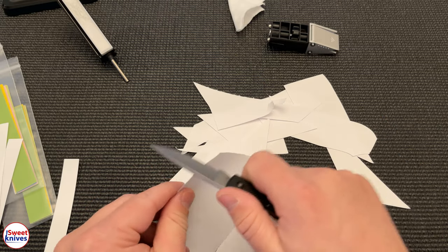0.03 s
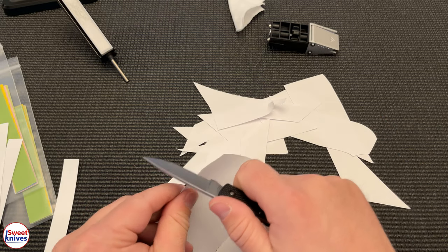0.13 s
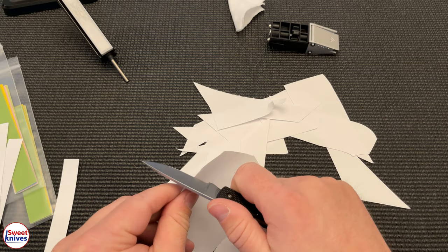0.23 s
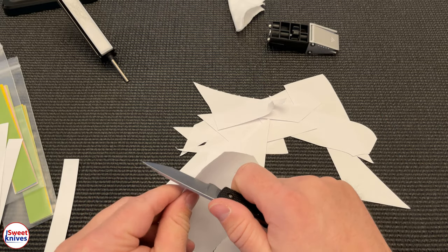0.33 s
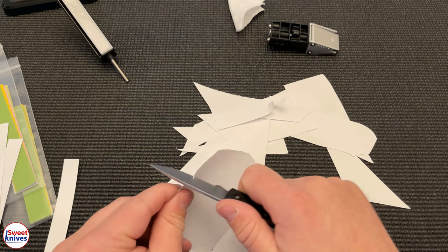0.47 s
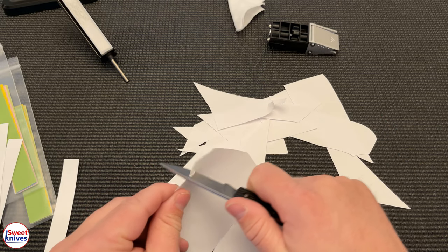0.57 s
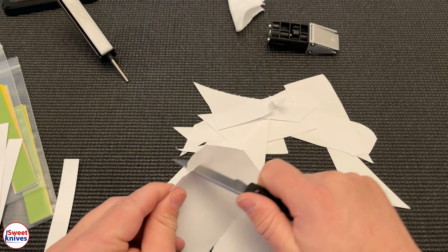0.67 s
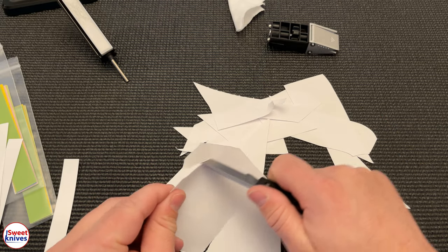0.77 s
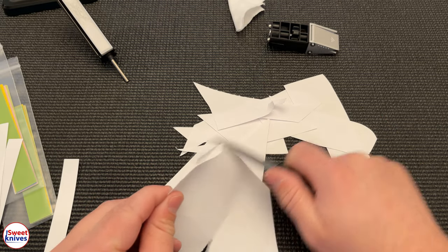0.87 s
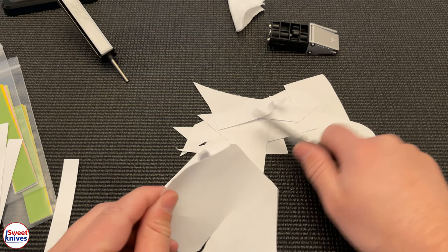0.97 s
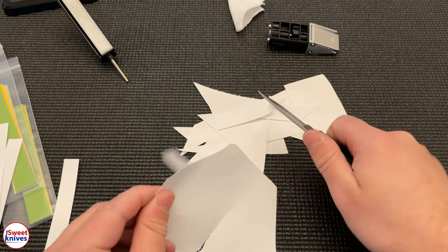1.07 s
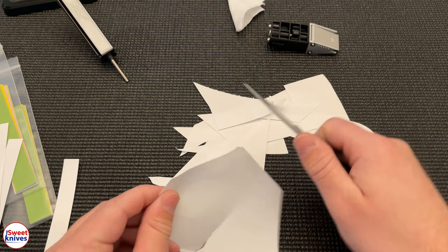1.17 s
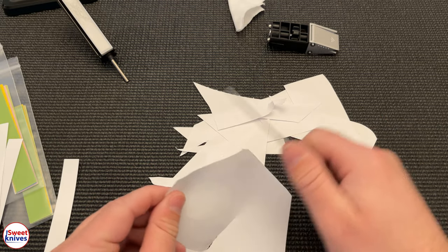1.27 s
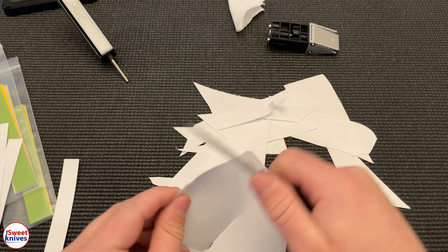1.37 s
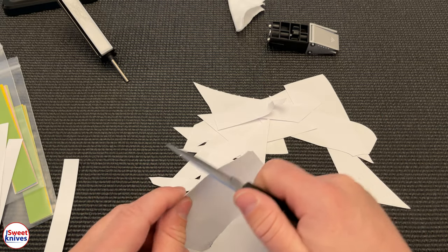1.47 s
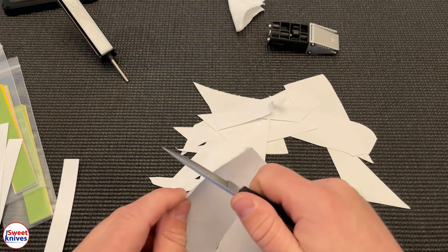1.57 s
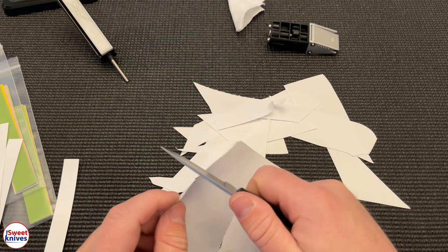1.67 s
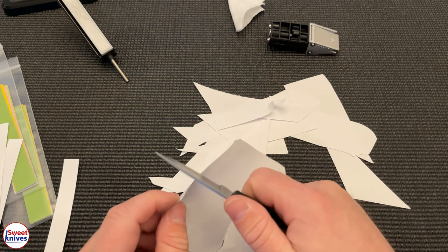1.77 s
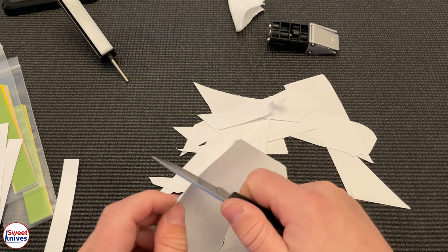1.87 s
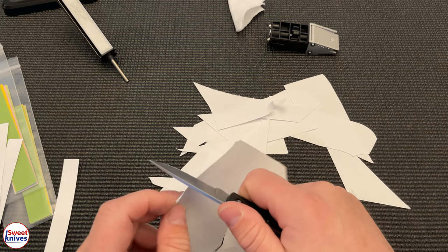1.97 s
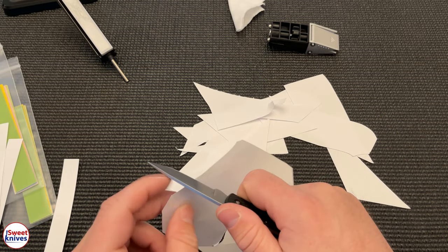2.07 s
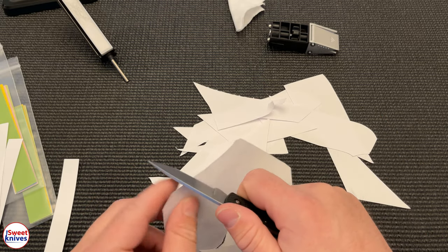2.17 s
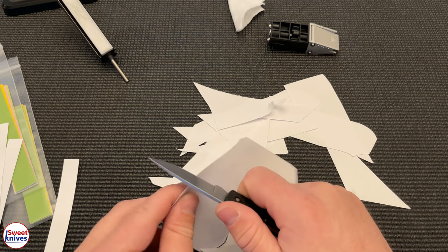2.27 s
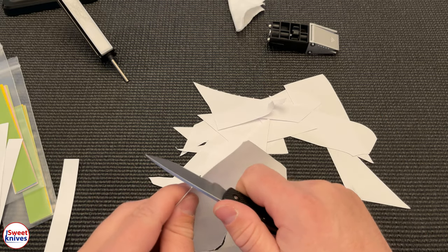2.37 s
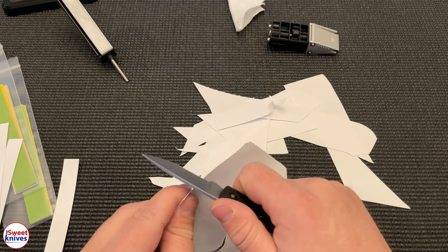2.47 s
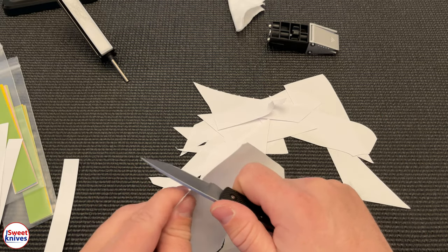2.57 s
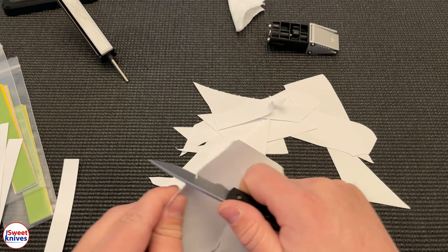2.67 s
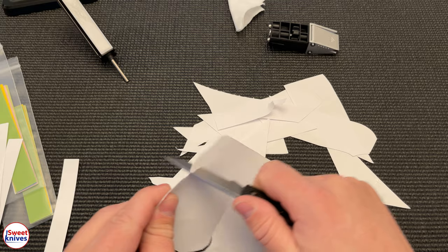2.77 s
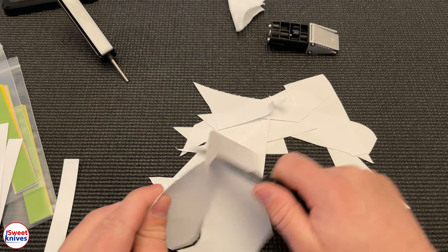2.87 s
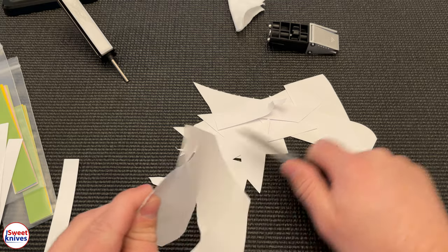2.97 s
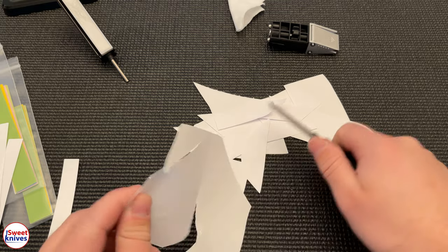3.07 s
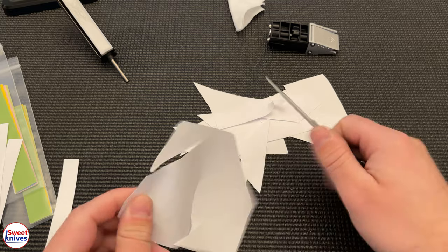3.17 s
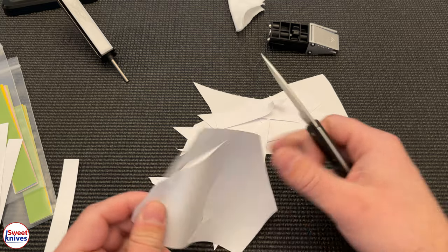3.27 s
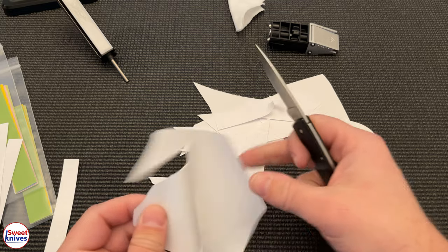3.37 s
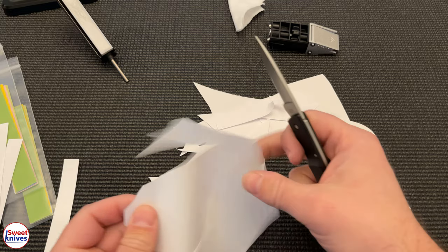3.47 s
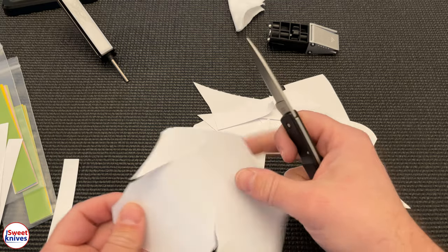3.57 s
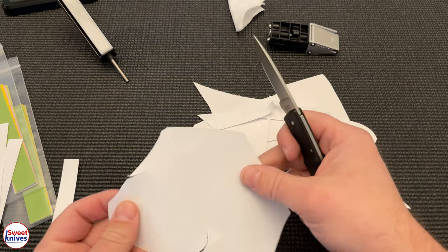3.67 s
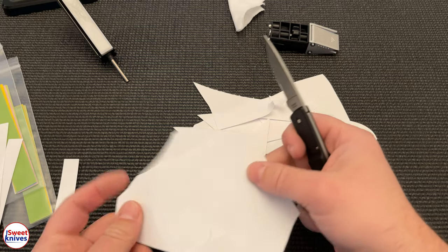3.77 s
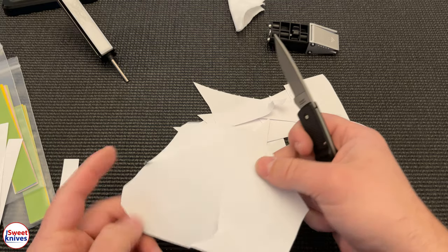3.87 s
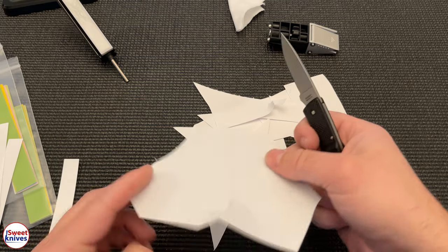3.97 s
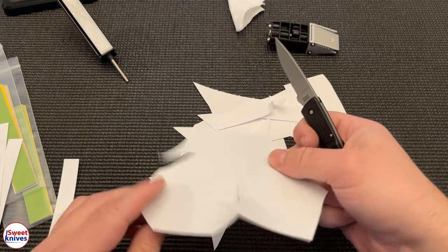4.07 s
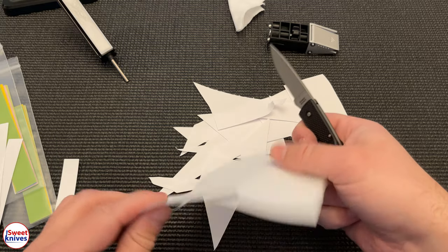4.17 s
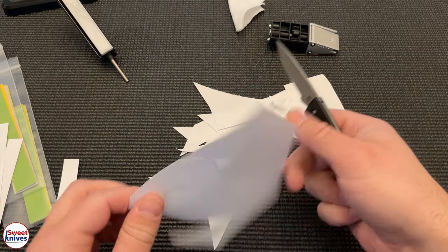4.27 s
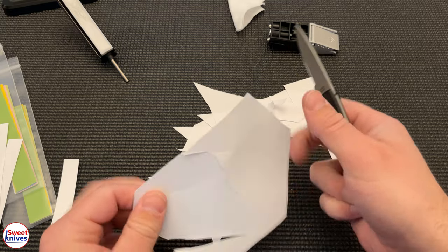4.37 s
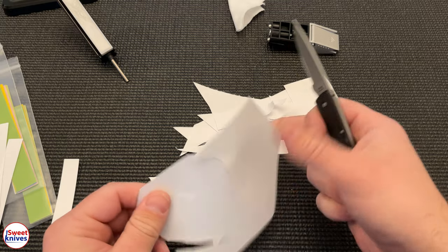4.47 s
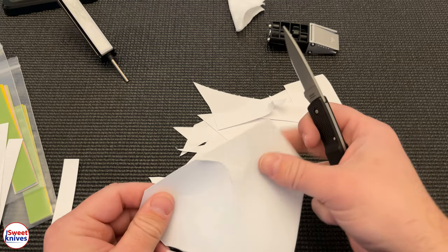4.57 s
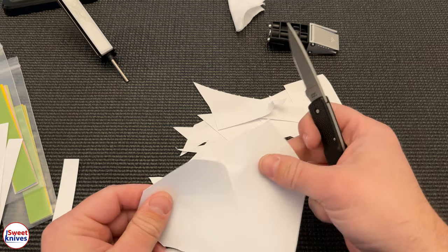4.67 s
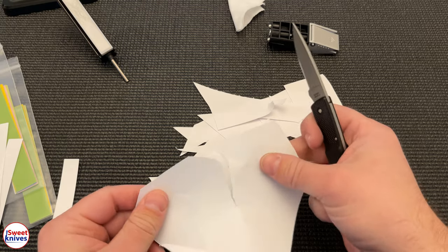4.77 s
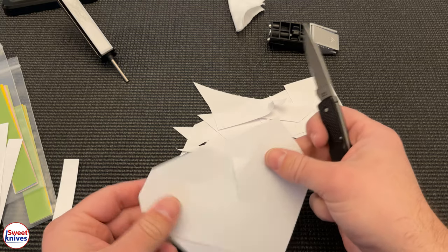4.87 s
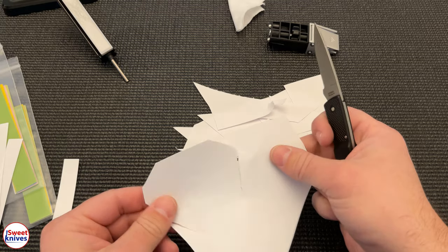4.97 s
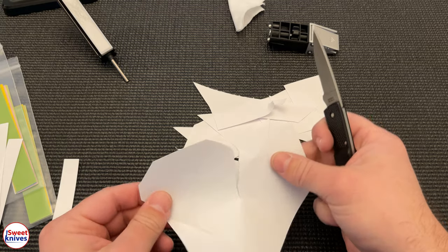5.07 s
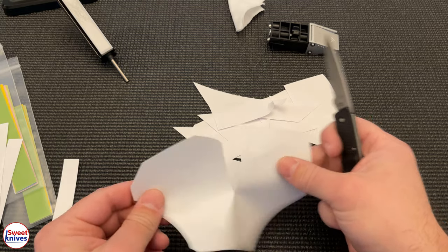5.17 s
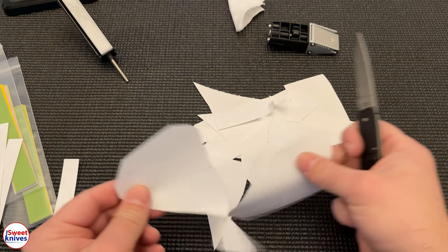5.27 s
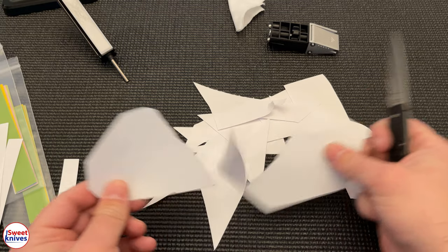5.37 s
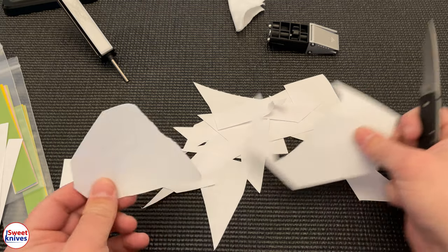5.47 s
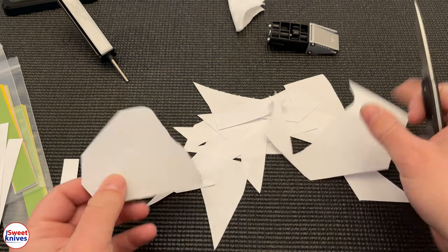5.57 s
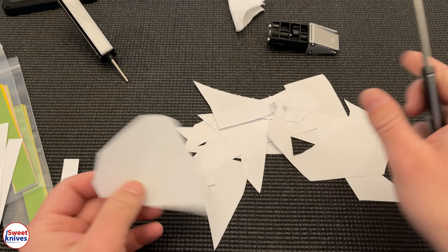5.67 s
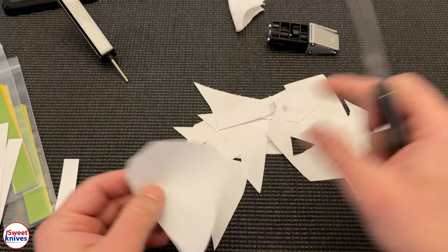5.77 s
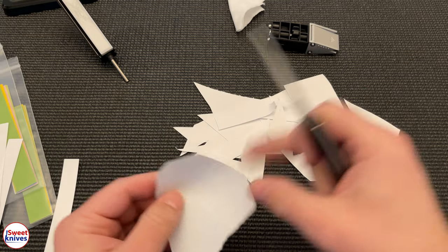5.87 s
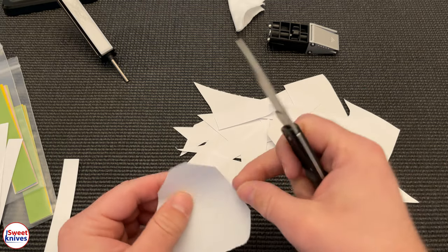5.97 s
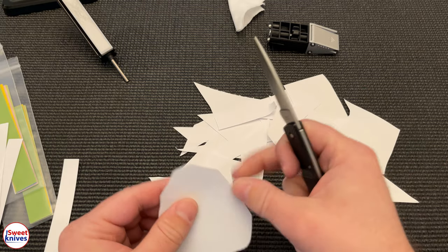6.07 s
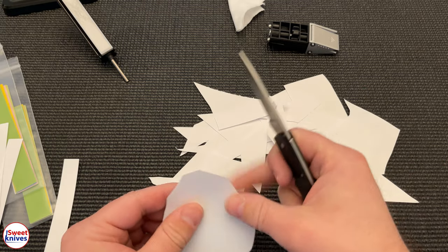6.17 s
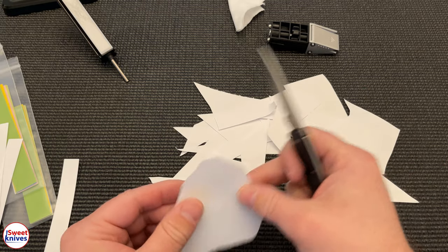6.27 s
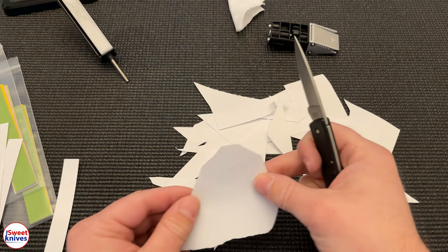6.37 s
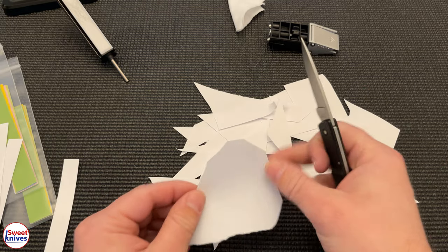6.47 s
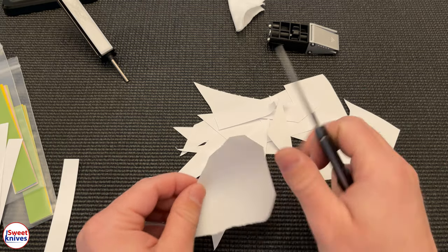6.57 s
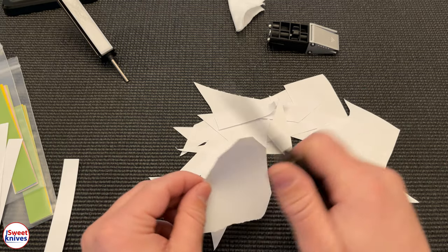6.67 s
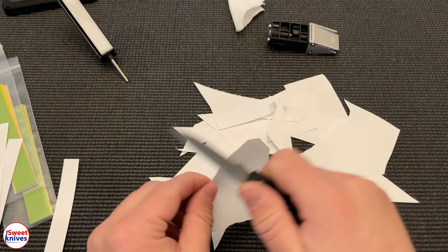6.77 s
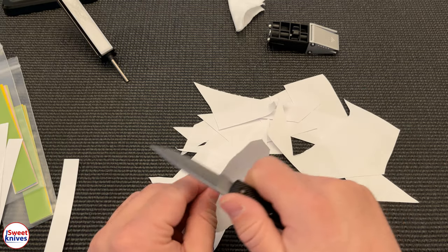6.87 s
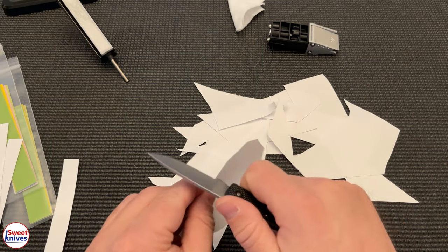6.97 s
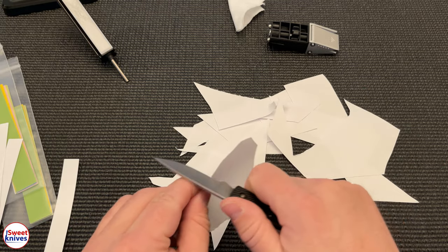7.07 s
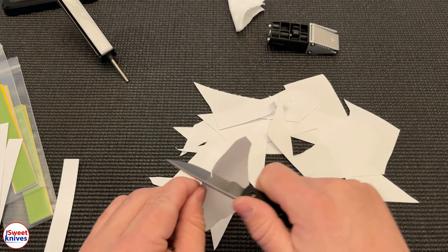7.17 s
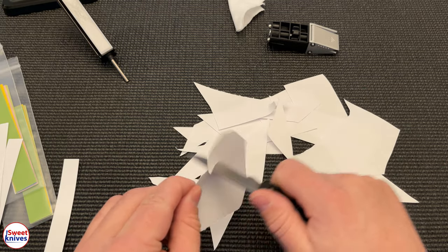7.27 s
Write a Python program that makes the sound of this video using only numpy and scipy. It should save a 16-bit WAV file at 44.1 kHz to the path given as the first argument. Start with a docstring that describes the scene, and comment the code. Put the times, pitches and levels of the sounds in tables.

```python
"""A sharp folding knife slices a hand-held sheet of paper four times, over a padded desk in a small room.
Each cut is a stream of snapping fibres that the sheet radiates; the loosened strip flutters as the
blade runs out. Between cuts the sheet is turned and regripped: it slides, flaps, buckles with small
pops and brushes the fingers. The hands bump the desk pad; ventilation rumbles underneath."""
import sys
import numpy as np
from scipy import signal
from scipy.fft import rfft, irfft
from scipy.io import wavfile

SR = 44100
rng = np.random.default_rng(int(sys.argv[2]) if len(sys.argv) > 2 else 0)


def store_wav(level_fs):
    """Save 16-bit WAV to argv[1]."""
    pcm = np.round(np.clip(np.atleast_2d(level_fs), -1, 1) * 32767)
    wavfile.write(sys.argv[1], SR, pcm.T.astype(np.int16))


N = 322371
TIME_S = np.arange(N) / SR


def from_db(db):
    """Decibels to gain."""
    return np.exp(np.asarray(db) * (np.log(10) / 20))


def rms_one(x):
    """Scale to rms 1."""
    return x / np.sqrt(np.mean(x ** 2) + 1e-20)


def at_hz(points, hz):
    """Read a table on a log-frequency axis."""
    points = np.array(points)
    return np.interp(np.log(np.maximum(hz, 1)), np.log(points[:, 0]), points[:, 1])


def colour(x, *spectra, size=2048):
    """Minimum-phase filter with the summed dB of the spectra."""
    hz = np.arange(size // 2 + 1) * SR / size
    cepstrum = irfft(np.log(from_db(sum(at_hz(points, hz) for points in spectra))))
    cepstrum[1:size // 2] *= 2
    cepstrum[size // 2 + 1:] = 0
    return signal.fftconvolve(x, irfft(np.exp(rfft(cepstrum))))[:len(x)]


def band(x, low_hz, high_hz):
    """Butterworth band-pass."""
    return signal.sosfilt(signal.butter(2, [low_hz, high_hz], "band", fs=SR, output="sos"), x)


def ring(x, modes):
    """Add resonances to x; rows: f/Hz, width/Hz, gain/dB."""
    return x + sum(from_db(db) * signal.lfilter(*signal.iirpeak(hz, hz / width_hz, fs=SR), x + 1e-18)
                   for hz, width_hz, db in modes)


def drift(per_s):
    """Random wander, rms 1."""
    knots = rng.standard_normal(N // 20)
    return rms_one(np.interp(TIME_S * per_s, np.arange(len(knots)), knots))


def grains(per_s, spread_db):
    """Random clicks of uneven size and sign, rms 1."""
    sizes = from_db(spread_db * np.clip(rng.standard_normal(N), -2, 2)) * rng.choice([-1, 1], N)
    return rms_one(sizes * (rng.random(N) < per_s / SR))


def add(track, t_s, sound):
    """Mix a sound in at t_s."""
    start = max(round(t_s * SR), 0)
    track[start:start + len(sound)] += sound[:N - start]


def swells(rows, lead_s):
    """Gain that rises and fades once per row: t/s, level/dB, fade/s."""
    out = np.zeros(N)
    for t_s, db, fade_s in rows:
        progress = np.arange(SR // 3) / SR / fade_s
        add(out, t_s - lead_s, from_db(db) * progress * np.exp(1 - progress))
    return out


def hump(t_s, rise_s, fall_s):
    """Lopsided bell, 1 at t_s."""
    out, near = np.zeros(N), np.abs(TIME_S - t_s) < 1
    since_s = TIME_S[near] - t_s
    out[near] = np.exp(-(since_s / np.where(since_s < 0, rise_s, fall_s)) ** 2)
    return out


# background spectrum: f/Hz, level/dB
AMBIENCE_SPECTRUM = [(15, -71), (25, -19.5), (64, -10.5), (110, -2), (152, -6.5), (221, -5.5), (267, -9),
                     (297, -9.5), (378, -13.5), (523, -15.5), (582, -14.5), (970, -20), (1340, -23),
                     (10900, -32.5), (15500, -33.5)]
def ambience(level_db=-69.5):
    """Steady ventilation rumble and microphone hiss."""
    return from_db(level_db) * rms_one(colour(rng.standard_normal(N), AMBIENCE_SPECTRUM, size=8192))


# sheet slides and bends: fastest t/s, rise/s, relative rub level/dB, relative flex level/dB
SHEET_MOVES = [(0.07, 0.16, -68, -80), (1.19, 0.05, -76, -72), (1.45, 0.12, -73, -92),
               (1.94, 0.22, -64.5, -79), (2.18, 0.13, -60.5, -90), (3.15, 0.064, -65.5, -66),
               (3.36, 0.067, -63, -67), (3.54, 0.12, -64, -64), (3.82, 0.19, -69, -81),
               (4.12, 0.077, -60.5, -75), (4.23, 0.049, -57.5, -89), (4.51, 0.067, -68, -69),
               (4.72, 0.23, -71.5, -76), (4.88, 0.085, -74, -71), (5.1, 0.083, -69, -75),
               (5.71, 0.13, -67, -79), (5.92, .08, -74.5, -99), (6.32, 0.13, -74, -88)]
def handling(hold_db, column, fall_s=0.098, still_s=6.5):
    """Gain: one swell per move at the level in that column, over a rustle until the hands go still."""
    holding = from_db(hold_db) * np.clip((still_s - TIME_S) / 0.047, 0, 1)
    return holding + sum(from_db(move[column]) * hump(move[0], move[1], fall_s) for move in SHEET_MOVES)


# finger brushes: t/s, relative level/dB, fade/s
FINGER_BRUSHES = [(1.131, -56, 0.016), (1.278, -48.5, 0.0048), (1.331, -43, 0.0047), (1.483, -51.5, .009),
                  (1.573, -53.5, 0.013), (1.975, -55.5, 0.0091), (3.304, -49.5, 0.0061),
                  (3.329, -46.5, .013), (3.712, -47.5, 0.0066), (4.068, -50, 0.0055), (4.266, -49, 0.0091),
                  (4.776, -52.5, .007), (4.892, -51, 0.013), (5.87, -48.5, 0.016), (5.933, -53.5, 0.015),
                  (6.307, -58, .007), (6.409, -59, 0.013)]
# skin-on-paper spectrum: f/Hz, level/dB
RUB_SPECTRUM = [(300, -6.5), (900, -7.5), (1500, -3.5), (2400, -4.5), (4500, 2.5), (8000, -1.5),
                (12000, -4.5), (15500, -12)]
def sliding():
    """Skin and paper rub with a fine grain; each brush is a short swell of it."""
    slides = from_db(-3.5) * handling(hold_db=-77.5, column=2)
    brushes = from_db(-11.5) * swells(FINGER_BRUSHES, lead_s=0.003)
    rub = grains(per_s=8000, spread_db=4.5) * from_db(1.5 * drift(per_s=90))
    return (slides + brushes) * rms_one(colour(rub, RUB_SPECTRUM))


# bending-paper spectrum: f/Hz, level/dB
FLEX_SPECTRUM = [(150, -13), (500, 1.5), (950, -9), (1500, -8), (2400, -7.5), (5000, -14.5), (12000, -19)]
def flexing():
    """The turning sheet crumples softly, in clumps."""
    crinkles = grains(per_s=1200, spread_db=4) * from_db(3 * drift(per_s=45))
    return from_db(-9) * handling(hold_db=-73.5, column=3) * rms_one(colour(crinkles, FLEX_SPECTRUM))


# sheet flaps: t/s, relative level/dB
SHEET_FLAPS = [(0.185, -54), (0.633, -48), (1.83, -52), (2.127, -56), (4.073, -49), (4.34, -50),
               (4.54, -44.5), (4.634, -46), (4.892, -45.5), (5.624, -40), (6.167, -52.5), (6.307, -51)]
# flap spectrum: f/Hz, level/dB
FLAP_SPECTRUM = [(100, -12), (350, -6), (600, 1), (950, -2.5), (1600, -5), (3000, -14), (5000, -20),
                 (12000, -29)]
def flapping(fade_s=0.0053):
    """The sheet bends over with a soft, hollow flap."""
    envelope = swells([(t_s, db, fade_s) for t_s, db in SHEET_FLAPS], lead_s=0.0036)
    crinkles = grains(per_s=6000, spread_db=2)
    return from_db(-13) * envelope * rms_one(colour(crinkles, FLAP_SPECTRUM))


# buckles, relative levels: t/s, level/dB, thud/dB, crack/dB; the row at 5.297 s is the blade tearing out of the
# sheet's edge
BUCKLES = [(0.331, -53.5, -26, 0), (1.189, -47.5, -15, 1), (2.123, -45.5, -24, -7),
           (2.252, -36.5, -17, -31), (2.306, -48.5, -18, -7), (2.856, -26.5, -21, -11.5),
           (2.893, -26, -18, -10), (3.155, -35.5, -24, -11), (3.446, -40.5, -32, -1),
           (3.477, -44.5, -35, -1), (3.498, -40.5, -21, -11), (3.517, -32, -45, -3),
           (3.569, -40, -12.5, -22), (4.007, -51, -33, -4), (4.28, -32, -10.5, -7.5),
           (4.287, -37.5, -36, -54), (4.63, -44.5, -6, 0), (4.926, -40.5, -17.5, -32), (5.174, -29, -29, 2),
           (5.297, -27.5, -25, -3.5), (6.167, -50, -11, 1)]
# pop spectrum: f/Hz, level/dB
POP_SPECTRUM = [(30, -27), (90, -1), (250, -8.5), (500, -7), (900, -5), (2800, -4), (5000, -2.5),
                (9000, -9), (12000, -9), (15500, -24)]
def buckling(fade_s=0.0045, size=4096):
    """Each buckle, and the blade's tear-out, pops: one snap and a short burst of creases, with its own colour."""
    out, age_s = np.zeros(N), np.arange(size) / SR
    for t_s, db, thud_db, crack_db in BUCKLES:
        creases = rng.standard_normal(size) * np.exp(-age_s / fade_s)
        crispness = np.clip(from_db(crack_db + 2), 0.5, 0.8)  # bright buckles give way all at once
        snap = crispness * np.linalg.norm(creases) * (age_s == 0)
        tilt = [(250, thud_db + 23), (800, 0.036), (3400, 0.0057), (8000, crack_db + 6)]
        pop = rms_one(colour(creases + snap, POP_SPECTRUM, tilt))
        add(out, t_s + 0.0008, from_db(db - 21) * pop)
    return out


def fibres(bands=22, wander_db=2):
    """Thousands of tiny snaps; as the blade travels, each band swells and sinks on its own."""
    snaps = [grains(per_s=24000, spread_db=3) for _ in range(2)]
    edges_hz = np.r_[100, np.linspace(1500, 16500, bands)]
    out = np.zeros(N)
    for k, (low_hz, high_hz) in enumerate(zip(edges_hz, edges_hz[1:])):
        depth_db = wander_db * min(k / 4, 1)
        out += band(snaps[k % 2], low_hz, high_hz) * from_db(depth_db * drift(per_s=15))
    return rms_one(out)


def stroke(cut, depth, bite_s=0.0062, run_out_db_per_s=753):
    """Gain of one cut: the edge bites, sinks in, surges and leaves; depth scales sinking and surge."""
    enter_s, fastest_s, leave_s, _, surge_db, _, _, sink_s = cut
    bite = np.clip((TIME_S - enter_s) / bite_s + 0.5, 0, 1)
    sinking_db = 11 * np.exp(-np.clip(TIME_S - enter_s, 0, 1) / sink_s)
    pull_db = surge_db * hump(fastest_s, rise_s=0.06, fall_s=0.057)
    run_out_db = run_out_db_per_s * np.clip(TIME_S - leave_s, 0, 1)
    return bite * from_db(depth * (pull_db - sinking_db) - run_out_db)


# cuts, relative levels: enter t/s, fastest t/s, leave t/s, rasp/dB, surge/dB, edge/dB, strip/dB, sink/s
BLADE_CUTS = [(0.354, 0.827, 0.84, -47, 8, 0, -11.5, 0.061), (2.531, 2.853, 2.9, -46, 4.5, 1, -12.5, 0.091),
              (5.131, 5.192, 5.303, -46, 8, 1.5, -5, 0.02),
              (7.067, 7.288, 7.334, -44, 3.5, -2.5, -16, 0.054)]
# resonances of the free part of the sheet, one row per cut: 4 x (f/Hz, width/Hz, gain/dB)
FREE_SHEET_MODES = [
    [(2070, 290, -7), (6540, 870, -10), (11300, 360, -19), (12600, 700, -14)],
    [(3410, 340, -5), (4670, 1200, -4.5), (7500, 390, -8), (8700, 630, -7)],
    [(4200, 200, 1), (6040, 260, -14), (9400, 410, -3), (13100, 600, -7)],
    [(3170, 1100, -1.5), (4700, 780, -5), (5960, 310, -5), (8560, 400, -2)],
]
# snapping-fibre spectrum: f/Hz, level/dB
RASP_SPECTRUM = [(150, -37), (480, -13.5), (720, -4), (830, -2), (1050, -4.5), (1450, -3.5), (2200, 1.5),
                 (5800, 2.5), (6900, -0.5), (9500, 0.5), (13000, -3.5), (15500, -9.5)]
def slicing(brightening=0.22):
    """The edge parts the fibres in uneven bunches; a faster blade sounds louder and brighter."""
    snaps = colour(fibres() * from_db(0.5 * drift(per_s=160)), RASP_SPECTRUM)
    out = np.zeros(N)
    for cut, modes in zip(BLADE_CUTS, FREE_SHEET_MODES):
        rasp_db, edge_db = cut[3], cut[5]
        rasp = ring(snaps, modes)
        body = rms_one(signal.sosfilt(signal.butter(4, 7100, fs=SR, output="sos"), rasp))
        edge = rms_one(signal.sosfilt(signal.butter(4, 7600, "high", fs=SR, output="sos"), rasp))
        speed = stroke(cut, depth=0.9)
        brightness = from_db(edge_db - 2.5) * speed ** brightening
        out += from_db(rasp_db) * speed * (from_db(-0.72) * body + brightness * edge)
    return out


# strips come free: t/s, relative level/dB
FREED_STRIPS = [(0.862, -47.5), (2.887, -47.5), (5.306, -47)]
# loose-strip spectrum: f/Hz, level/dB
FLUTTER_SPECTRUM = [(40, -8), (130, 1), (290, -2), (380, -5.5), (500, -3), (950, -4.5), (2000, -5.5),
                    (4000, -6.5), (9000, -15.5)]
def flutter(stiff_db=-47.5):
    """The strip trembles with the rasp in dull crinkles; once free, it swings out and settles."""
    crinkles = grains(per_s=2500, spread_db=2)
    attached = np.zeros(N)
    for cut in BLADE_CUTS:
        rasp_db, strip_db = cut[3], cut[6]
        attached += from_db(rasp_db + strip_db) * stroke(cut, depth=0.57)
    freed = sum(from_db(db) * hump(t_s, rise_s=0.047, fall_s=0.037) for t_s, db in FREED_STRIPS)
    swing = np.hypot(attached, freed)
    looseness = swing / (swing + from_db(stiff_db))  # a barely moving strip stays stiff
    return from_db(3) * swing * looseness * rms_one(colour(crinkles, FLUTTER_SPECTRUM))


# hands bump sheet and desk pad: t/s, relative level/dB
HAND_BUMPS = [(0.881, -61), (2.896, -63), (3.302, -59), (3.568, -58.5), (4.284, -58.5), (4.634, -61),
              (5.288, -63), (5.323, -63.5)]
# padded-desk modes: f/Hz, level/dB, t60/s
DESK_THUD_MODES = [(78.4, -7, 0.079), (125.5, 5, 0.073), (222, 0, 0.079), (342, -4, 0.042)]
def bumps(attack_s=0.00074, spread_db=2, size=8192):
    """Each bump excites the low, well-damped desk modes at slightly random strengths."""
    out, age_s = np.zeros(N), np.arange(size) / SR
    attack = 1 - np.exp(-age_s / attack_s)
    for t_s, db in HAND_BUMPS:
        for hz, mode_db, t60_s in DESK_THUD_MODES:
            start_db = db + 3 + mode_db + spread_db * rng.standard_normal()
            fade = from_db(start_db - 60 * age_s / t60_s)
            add(out, t_s - 0.003, attack * fade * np.sin(2 * np.pi * hz * age_s))
    return out


# room decay: f/Hz, t60/s
ROOM_DECAY = [(200, 0.24), (1400, 0.51), (3700, 0.42), (7000, 0.41), (13000, 0.32)]
def room(x, wall_db, tail_db, wall_delay_s=0.0088, size=24000):
    """Near walls answer in a cluster; then a diffuse tail dies, lasting longest in the midrange."""
    age_s = np.arange(size) / SR
    walls = band(rng.standard_normal(size), 225, 6230) * np.exp(-((age_s - wall_delay_s) / 0.0034) ** 2)
    edges_hz = np.geomspace(80, 16000, 9)
    tail = np.zeros(size)
    for low_hz, high_hz in zip(edges_hz, edges_hz[1:]):
        t60_s = at_hz(ROOM_DECAY, np.sqrt(low_hz * high_hz))
        tail += band(rng.standard_normal(size), low_hz, high_hz) * from_db(-60 * age_s / t60_s)
    build_up = np.clip(age_s / 0.013 - 0.4, 0, 1)
    tail = colour(tail * build_up, [(300, 0.5), (4500, -3.5), (9000, -7), (15000, -10)])
    response = (from_db(wall_db) * rms_one(walls) + from_db(tail_db) * rms_one(tail)) / np.sqrt(size)
    return x + signal.fftconvolve(x, response)[:N]


# sheet and desk resonances: f/Hz, width/Hz, gain/dB
SHEET_DESK_MODES = [(378, 18, 2.5), (833, 16, 0), (1022, 98, 4.5), (1180, 8.9, 2), (1590, 100, -14),
                    (1880, 107, -7.5), (2300, 180, -10), (2590, 48, -5.5), (2910, 42, -6), (3600, 50, -37),
                    (4850, 89, -7)]
def scene():
    """Mono mix; the bending sheet throws more of its sound at the walls than the blade does."""
    friction = ring(slicing() + sliding(), SHEET_DESK_MODES)
    friction = room(friction, wall_db=-10, tail_db=-10.5)
    bending = ring(buckling() + flutter() + flexing() + flapping() + bumps(), SHEET_DESK_MODES)
    bending = room(bending, wall_db=-1.5, tail_db=-5.5)
    return (from_db(-1) * friction + from_db(-2.5) * bending + ambience())[None]


def record(dry):
    """Steep low-pass at 15850 Hz."""
    return signal.sosfilt(signal.ellip(12, 0.1, 80, 15850, fs=SR, output="sos"), dry)


dry = scene()
out = record(dry)
store_wav(out)
```